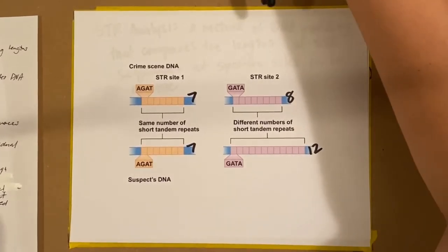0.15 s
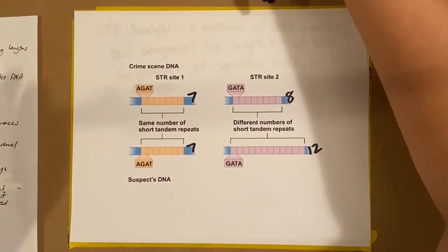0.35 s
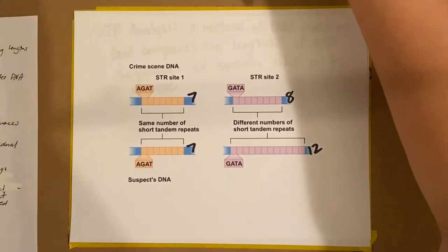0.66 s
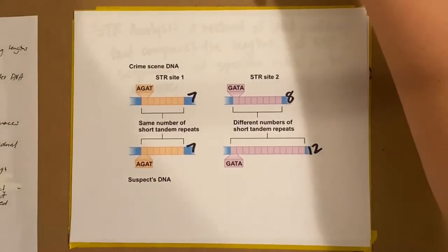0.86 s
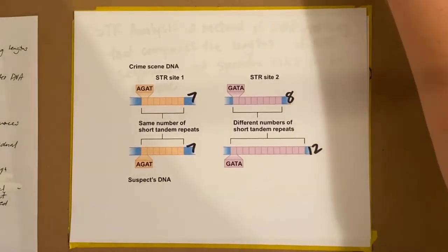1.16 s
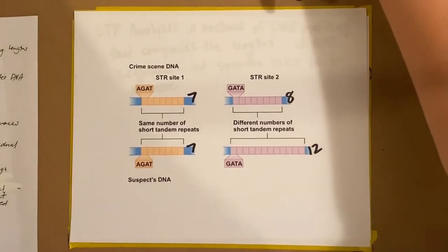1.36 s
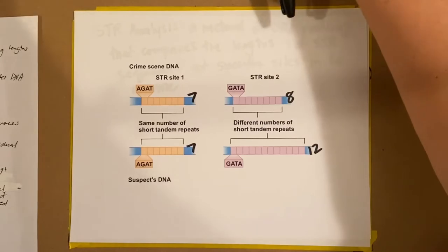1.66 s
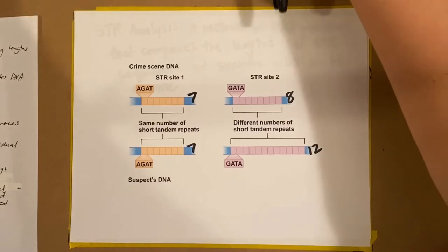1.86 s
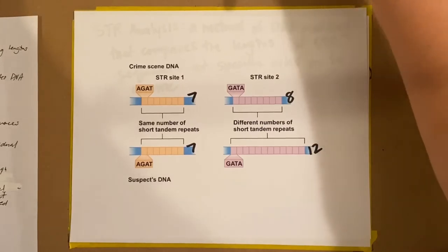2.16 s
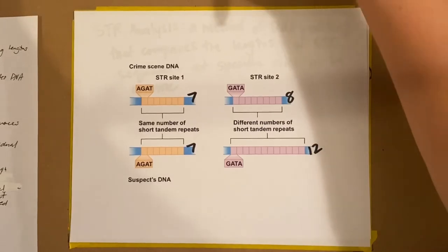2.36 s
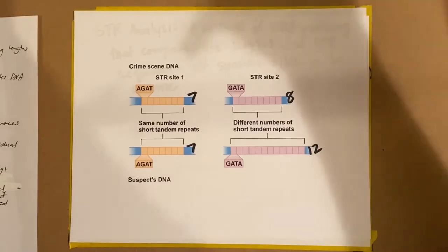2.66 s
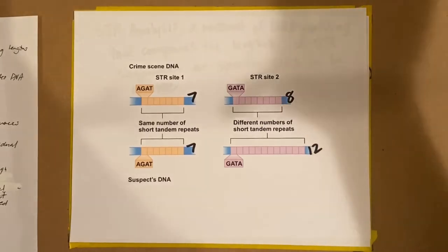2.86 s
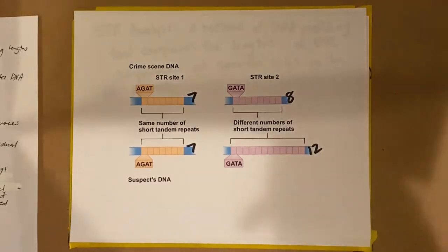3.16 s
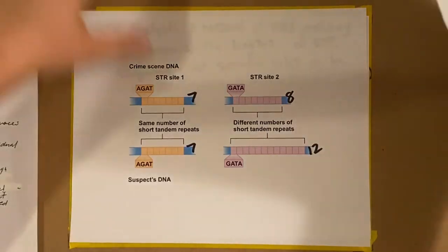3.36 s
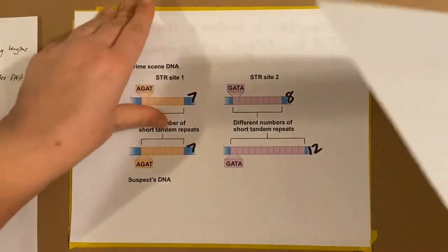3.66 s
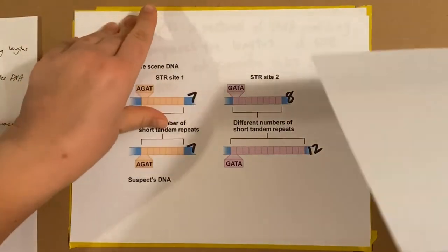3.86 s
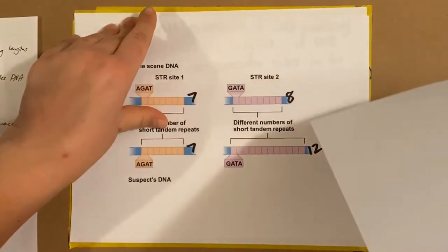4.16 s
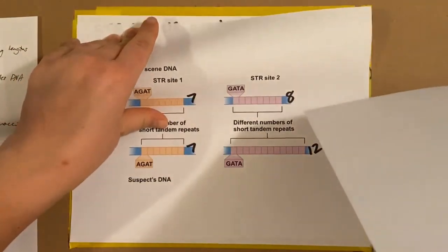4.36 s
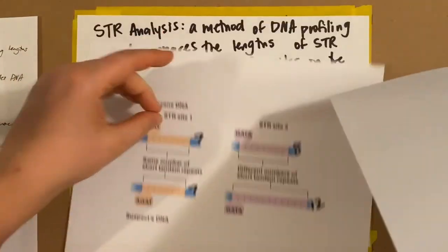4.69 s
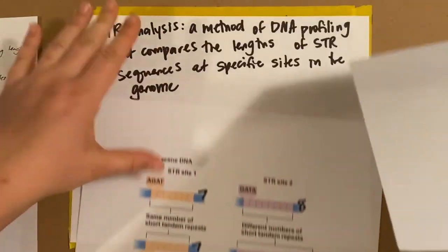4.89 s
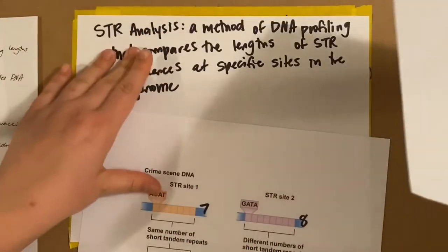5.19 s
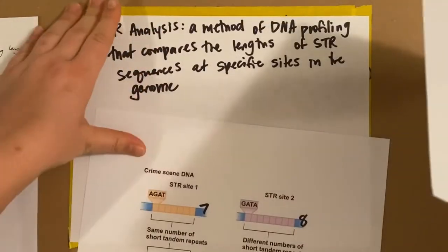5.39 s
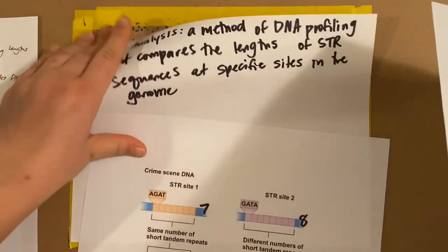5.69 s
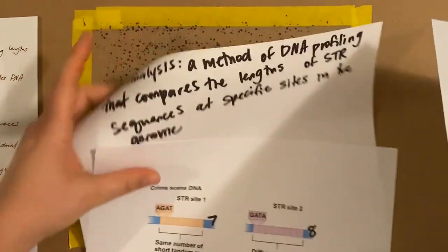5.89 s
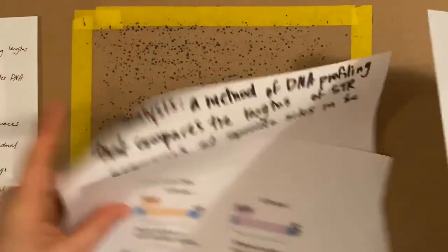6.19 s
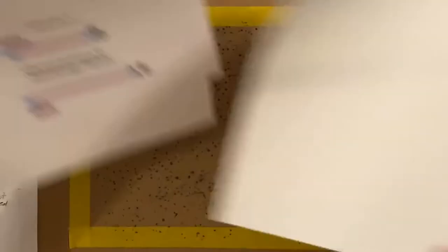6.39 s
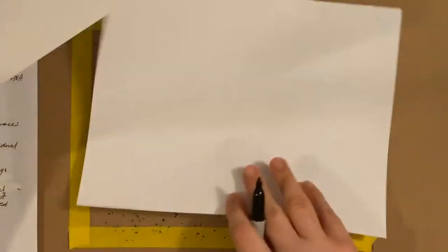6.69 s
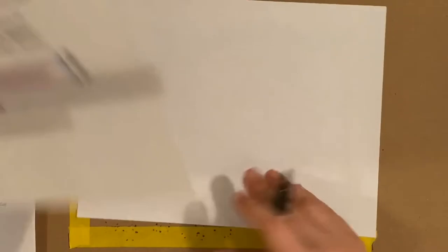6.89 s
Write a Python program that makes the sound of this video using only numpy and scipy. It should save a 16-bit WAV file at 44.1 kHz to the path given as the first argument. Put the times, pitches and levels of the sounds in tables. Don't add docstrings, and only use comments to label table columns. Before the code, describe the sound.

Close to a microphone just above a desk, fingers shift paper with faint rustles, sharp ticks and soft knocks. A few firmer bumps come early, then sheets slide with dry hisses and crackling folds. Near the end a loose sheet is slapped down in a rapid, loud cluster, then settles. A low ventilation hum stays underneath in a small room.

```python
import sys
import numpy as np
from scipy import signal
from scipy.fft import rfft, irfft
from scipy.io import wavfile
from scipy.ndimage import uniform_filter1d, map_coordinates

SR = 44100
rng = np.random.default_rng(int(sys.argv[2]) if len(sys.argv) > 2 else 0)


def digitize_waveform(pressure):
    field = np.atleast_2d(pressure).T
    bounded = np.clip(field, -1, 1)
    quanta = np.round(bounded * 32767).astype(np.int16)
    wavfile.write(sys.argv[1], SR, quanta)


def ratio(d):
    e = np.asarray(d, float) / 20
    return 10 ** e


N = 310464
HZ = np.fft.rfftfreq(N, 1 / SR)


def unit(x):
    return x / np.sqrt(np.mean(x ** 2))


def over_hz(table):
    hz, value = np.transpose(table)
    return np.interp(np.log(HZ + 1), np.log(hz), value)


def walk(rate_hz):
    hold = int(SR / rate_hz)
    steps = np.repeat(rng.standard_normal(N // hold + 1), hold)
    smooth = uniform_filter1d(uniform_filter1d(steps, hold), hold)
    return unit(smooth[:N])


def band(x, lo_hz, hi_hz, order=1):
    edges = np.clip([lo_hz, hi_hz], 20, 0.45 * SR)
    return signal.sosfilt(signal.butter(order, edges, "bandpass", fs=SR, output="sos"), x)


def add(out, s, db, sound):
    i = int(s * SR)
    out[i:i + len(sound)] += ratio(db) * sound / np.abs(sound).max()


# (f/Hz, level/dB per Hz)
AIR_COLOUR = [(25, -17), (60, -4.5), (120, -4.5), (170, -3.5), (250, -5), (450, -4), (600, -10.5),
              (1000, -18), (1800, -28.5), (2500, -36.5), (16000, -52)]
# (f/Hz, likeness 0 to 1)
AIR_ALIKE = [(70, 1), (170, 0.96), (400, 0.88), (650, 0.088), (1300, 0.09), (1900, 0.37), (16000, 0.32)]
# (f/Hz, level/dB rms)
MOTOR_HUM = [
    (118.4, -73),
    (236, -73),
    (274.5, -72.5),
]


def ventilation(air_db=-62.5):
    alike = np.clip(over_hz(AIR_ALIKE), 0, 1)
    shares = np.sqrt([1 + alike, 1 - alike])
    noise = rfft(rng.standard_normal((2, N)))
    mid, side = noise * ratio(over_hz(AIR_COLOUR)) * shares * (HZ > 22)
    air = unit(irfft([mid + side, mid - side], N)) * ratio(air_db + 1.0 * walk(4.5))
    hum = np.zeros(N)
    for hz, db in MOTOR_HUM:
        level = ratio(db + 2.56 * walk(9)) * np.sqrt(2)
        phase = 2 * np.pi * np.cumsum(hz * (1 + 0.02 * walk(12))) / SR
        hum += level * np.sin(phase)
    return air + hum


def room(x, room_db=-14, t60_s=0.44, dull_below_hz=6880, first_ms=3.3):
    t = np.arange(SR // 2) / SR
    noise = rng.standard_normal((3, len(t)))
    noise = noise[0] + 2.1 * band(noise[1:], 360, 1290, order=2)
    dull = signal.lfilter(*signal.butter(1, dull_below_hz, fs=SR), noise)
    bright = noise - dull
    tail = dull * ratio(-60 * t / t60_s) + bright * ratio(-95 * t / t60_s)
    tail = tail * (t > first_ms / 1000)
    tail = tail / np.sqrt(np.sum(tail ** 2) / 2)
    return ratio(room_db) * signal.fftconvolve(x[None], tail, axes=1)[:, :N]


# (t/s, peak level/dB, f/Hz)
DESK_KNOCKS = [(0.065, -48, 129.4), (0.948, -39, 220), (1.273, -55, 91), (1.31, -45.5, 350),
               (1.592, -44, 476), (1.72, -49, 277), (1.802, -48, 220), (1.829, -44, 332), (1.931, -47, 602),
               (2.244, -38.5, 340), (2.517, -41.5, 321), (2.738, -49, 281), (2.785, -44.5, 269),
               (2.247, -26.5, 1580), (2.86, -30, 281), (2.861, -21.5, 790), (3.176, -44, 220),
               (3.409, -50, 182), (4.536, -52, 249), (4.703, -45, 610), (6.125, -46, 290),
               (6.262, -27.5, 454), (6.272, -44, 384), (6.305, -51, 563), (6.494, -40, 430),
               (6.516, -45, 546), (6.558, -33, 424), (6.57, -33.5, 510), (6.65, -51, 555), (6.78, -43, 306)]
# (t/s, peak level/dB, f/Hz)
ARM_LEANS = [
    (.955, -40.5, 128),
    (1.811, -45.5, 123),
    (2.871, -49, 90),
    (5.03, -55, 50.3),
    (6.759, -48, 68),
    (6.851, -54, 45.1),
]


def thuds(cycles=1.24, push_ms=0.76):
    out = np.zeros(N)
    t = np.arange(6000) / SR
    for s, db, hz in DESK_KNOCKS + ARM_LEANS:
        fade = np.exp(-hz * t / cycles)
        push = 1 - np.exp(-1000 * t / push_ms)
        add(out, s, db - 0.5, np.sin(2 * np.pi * hz * t) * fade * push)
    return out


def snaps(rows, kind, ring_oct=0.38, wide_db=-5.0, crack_oct=0.63):
    size = 1536
    out = np.zeros(N + size)
    ms = np.arange(size) * 1000 / SR
    length_ms, rise_ms, crack_hz = kind
    shape = (1 - np.exp(-ms / rise_ms)) * np.exp(-(ms / length_ms) ** 2)
    bursts = rng.standard_normal((len(rows), size)) * shape
    for (s, ring_db, hz, crack_db), burst in zip(rows, bursts):
        ring = band(burst, hz * 2 ** -ring_oct, hz * 2 ** ring_oct, order=2)
        wide_ring = band(burst, 0.82 * hz, min(2.41 * hz, 4500), order=3)
        crack = band(burst, crack_hz * 2 ** -crack_oct, crack_hz * 2 ** crack_oct, order=2)
        add(out, s, ring_db - 5.5, ring)
        add(out, s, ring_db + wide_db, wide_ring)
        add(out, s, crack_db - 0.6, crack)
    return out[:N]


# (t/s, sheet ring peak level/dB, ring f/Hz, crack peak level/dB)
TICKS = [(.065, -23, 1580, -21), (1.071, -29.5, 3330, -24.5), (1.103, -31, 2260, -39.5),
         (1.145, -33.5, 3540, -34), (1.155, -29.5, 1270, -32), (1.162, -32, 2190, -42),
         (2.786, -34, 1304, -60), (4.995, -53.5, 1500, -60), (5.024, -51, 3500, -44),
         (5.51, -61, 3980, -50), (5.646, -21.5, 2220, -27), (6.558, -13.5, 2260, -16),
         (6.738, -33, 3160, -38), (6.781, -29.5, 1200, -42)]
# (t/s, sheet ring peak level/dB, ring f/Hz, crack peak level/dB)
CREASES = [(.012, -60.5, 613, -65), (.405, -67, 760, -60), (.504, -59, 1350, -50.5), (.946, -40, 1550, -50),
           (1.058, -39, 2110, -49), (1.73, -42.5, 584, -51), (1.802, -30.5, 3580, -25.5),
           (1.83, -31, 3110, -29.5), (2.247, -24.5, 2020, -31.5), (2.28, -39.5, 640, -59),
           (2.517, -37.5, 615, -41), (2.738, -33, 1100, -37.5), (2.86, -20, 910, -31.5),
           (3.176, -36.5, 1040, -38.5), (3.187, -36, 1030, -40), (3.48, -45.5, 1940, -45.5),
           (4.535, -38.5, 1020, -33), (4.638, -42, 1370, -45), (4.703, -29.5, 1660, -35),
           (4.728, -38.5, 3760, -44), (5.032, -45.5, 2120, -55.5), (5.339, -51.5, 1100, -76),
           (5.397, -47, 2490, -47.5), (5.906, -37, 2400, -39), (6.57, -15.5, 1850, -48),
           (6.604, -22.5, 1890, -49), (6.621, -18.5, 1850, -26), (6.632, -18.5, 2160, -20),
           (6.652, -28, 2290, -24.5), (6.661, -17.5, 1650, -29)]
# (t/s, sheet ring peak level/dB, ring f/Hz, crack peak level/dB)
SCUFFS = [(.058, -31, 3020, -35), (1.273, -42, 900, -46.5), (1.551, -38, 1440, -34),
          (1.593, -36, 1210, -35), (1.678, -37.5, 3000, -25.5), (1.715, -34.5, 3000, -28.5),
          (1.809, -34.5, 1980, -30), (1.931, -38, 1220, -53), (1.966, -43.5, 1255, -51),
          (2.103, -42, 3080, -38.5), (2.238, -43, 2500, -46), (2.753, -32, 1010, -43.5),
          (3.016, -46, 4350, -52), (3.047, -45, 4100, -44), (3.408, -36, 1064, -37.5),
          (6.125, -45, 592, -43), (6.241, -30, 1520, -32), (6.263, -24, 1480, -36),
          (6.273, -24.5, 2380, -41), (6.305, -42, 1910, -34.5), (6.493, -51, 1540, -54),
          (6.516, -27, 870, -52.5), (6.563, -19.5, 1600, -44), (6.745, -34, 996, -40),
          (7.016, -46.5, 1580, -52)]
# (burst length/ms, rise/ms, crack f/Hz)
TICK, CREASE, SCUFF = (1.62, 0.024, 6000), (5.3, 0.22, 6700), (11.5, 0.74, 6960)


def paper_snaps():
    return snaps(TICKS, TICK) + snaps(CREASES, CREASE) + snaps(SCUFFS, SCUFF)


# (f/Hz, level/dB per Hz for a 0 dB layer)
PAPER_LAYERS = [(250, -38.5), (650, -29), (1800, -33.5), (5200, -37), (10500, -34.5), (15500, -48)]


def strokes(rows, kind, hz, t, gap_db=5.0, gap_oct=0.201):
    s, hold, body, fibre, gap_hz = np.transpose(rows)
    rise, fall, flap, sheen = kind
    octave = np.log2(hz + 1)
    layer_hz, per_hz_db = np.transpose(PAPER_LAYERS)
    flaps, bodies, sheens = flap + 0 * s, 0 * s, fibre + sheen
    layers = np.transpose([flaps, flaps, bodies, fibre, sheens, sheens]) + per_hz_db
    colour = np.array([np.interp(octave, np.log2(layer_hz), row) for row in layers])
    from_gap = octave - np.log2(gap_hz)[:, None]
    colour += gap_db * np.exp(-0.5 * (from_gap / gap_oct) ** 2)
    since = t - s[:, None]
    effort = body[:, None] + rise * np.minimum(since, 0) - fall * np.maximum(since - hold[:, None], 0)
    return ratio(2 * colour.T) @ ratio(2 * effort)


CREEPS = [
    (.0, 0.027, -80, -6, 1230),
    (.45, 0.1, -75.5, -2, 1550),
    (.66, .24, -75.5, -5.5, 3550),
    (1.33, 0.091, -69.5, -8.5, 900),
    (1.45, 0.15, -67, -0.5, 4100),
    (2.9, 0.28, -68, -18, 900),
    (3.22, .13, -71, -12.5, 937),
    (3.6, .28, -74.5, -2.5, 1110),
    (4.83, 0.5, -76, 1, 2090),
    (5.39, 0.078, -71.5, -7.5, 2600),
]
RUBS = [(.09, 0.03, -59, 4, 4750), (1.12, 0.04, -53, 5, 1600), (1.905, 0.0063, -64.5, 7.5, 4240),
        (2.1, 0.018, -57.5, -10.5, 1010), (2.41, 0.033, -51, -1, 3970), (2.6, 0.11, -64.5, 8.5, 1525),
        (4.22, .07, -58.5, 0.5, 3800), (4.24, 0.093, -54, -1, 2360), (5.57, 0.095, -55.5, 2.5, 3230),
        (5.64, 0.051, -49, -1.5, 2580), (6.22, 0.1, -53.5, 3.5, 1900), (6.8, 0.01, -60, 7, 3500),
        (7.03, .02, -56.5, -5.5, 3180)]
SKIMS = [
    (.955, 0.023, -67, 6.5, 2100),
    (1.25, 0.021, -58, -3, 4100),
    (2.48, 0.061, -63, 6.5, 3120),
    (3.5, 0.088, -65.5, -3.5, 2730),
    (4.38, 0.15, -50.5, -0.5, 3570),
    (4.58, 0.1, -61.5, 2, 6100),
    (4.67, .03, -52.5, -4, 2710),
    (5.71, 0.048, -55, 4.5, 1900),
    (5.83, 0.18, -57.5, -0.5, 3630),
    (6.03, 0.2, -60.5, 3, 4730),
]
FLAPS = [(1.04, 0.14, -58.5, -8, 940), (1.285, 0.0061, -56.5, -23, 970), (1.6, 0.0088, -61, 2.5, 1280),
         (1.69, 0.024, -59.5, 3, 5100), (1.812, 0.0076, -48, -6, 4000), (1.87, .02, -63, -3, 900),
         (1.925, 0.032, -52.5, -28, 1100), (.955, 0.036, -63.5, -8, 654), (2.252, 0.0085, -52, -5, 625),
         (2.3, 0.037, -65.5, -5, 1730), (2.745, 0.023, -50, -36, 960), (2.872, 0.024, -50.5, -10.5, 850),
         (2.98, 0.032, -72, 0, 900), (3.19, 0.0061, -58, -5, 970), (3.415, 0.016, -61.5, 2, 2740),
         (4.535, 0.0056, -62.5, -9, 1020), (4.71, 0.008, -55, 4.5, 1570), (6.105, 0.0081, -59.5, 1, 900),
         (6.265, 0.057, -49.5, -5, 750), (3.02, 0.037, -63.5, 6, 4300), (2.5, 0.065, -60.5, -4, 700),
         (5.84, 0.044, -70, -6, 900)]
SLAPS = [
    (6.497, 0.017, -46, -20, 1850),
    (6.524, .012, -38, -16.5, 2300),
    (6.565, 0.0077, -34.5, -28, 1960),
    (6.607, .01, -36, -18, 1890),
    (6.638, 0.036, -33.5, -15, 1510),
    (6.76, 0.05, -53, -2.5, 1530),
    (6.86, 0.13, -61.5, -11, 1930),
]
# (rise/dB per s, fall/dB per s, flap over body/dB, sheen over fibre/dB)
CREEP, RUB, SKIM = (395, 501, -17, 8), (294, 163, -21.5, -3.5), (243, 178, -18, 6.5)
FLAP, SLAP = (1998, 189, 0, -5), (1500, 305, -7.5, -10)


def slide(grit_db=2.0, drag_db=1.46, patchy_db=3.0):
    grit = np.minimum(rng.exponential(size=N), 5.0)
    slips = unit(rng.standard_normal(N) * ratio(grit_db * grit + drag_db * walk(90)))
    hz, t, cells = signal.stft(slips, SR, nperseg=512, noverlap=384)
    kinds = [(SKIMS, SKIM), (RUBS, RUB), (FLAPS, FLAP), (CREEPS, CREEP), (SLAPS, SLAP)]
    power = sum(strokes(rows, kind, hz, t) for rows, kind in kinds)
    places = np.meshgrid(3 * np.log2(hz + 1), 14 * t, indexing="ij")
    patches = map_coordinates(rng.standard_normal((48, 104)), places, order=1)
    cells = cells * np.sqrt(power) * ratio(patchy_db * patches)
    hiss = signal.istft(cells, SR, nperseg=512, noverlap=384)[1][:N]
    return hiss * np.sqrt(SR / 2)


def scene():
    hiss = slide()
    clicks = paper_snaps() + thuds()
    echo = room(clicks + ratio(-4) * hiss)
    return hiss + clicks + echo + ventilation()


def top_cut(x):
    return signal.sosfilt(signal.butter(12, 16500, fs=SR, output="sos"), x)


# (f/Hz, lead/radians)
PORT_LEAD = [(1800, 0), (2600, 0.7), (4500, 0.6), (5000, 2.2), (5500, 1.5), (8000, 2.75), (11800, 3.6),
             (16000, 5.4)]


def record(dry):
    lead = np.interp(HZ, *np.transpose(PORT_LEAD)) / 2
    fuller = ratio(over_hz([(110, 0.039), (380, 0.9), (700, 0.97), (1300, 0.27)]))
    left_right = [np.exp(1j * lead) / fuller, np.exp(-1j * lead) * fuller]
    ports = irfft(rfft(dry) * (HZ < 15850) * left_right, N)
    return top_cut(ports)


dry = scene()
out = record(dry)
digitize_waveform(out)
```